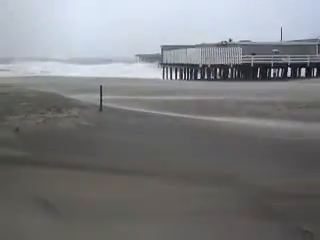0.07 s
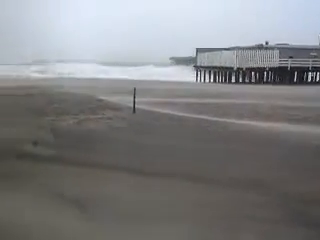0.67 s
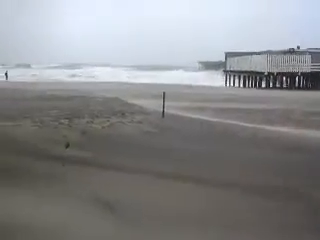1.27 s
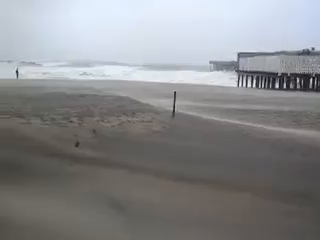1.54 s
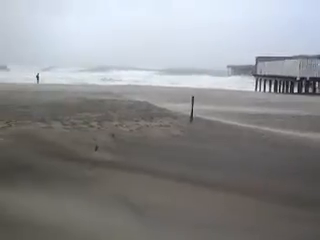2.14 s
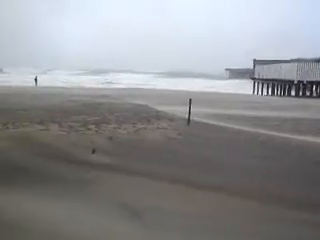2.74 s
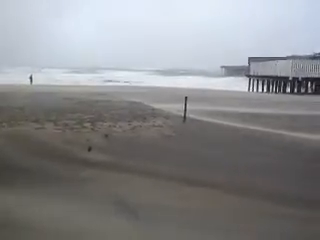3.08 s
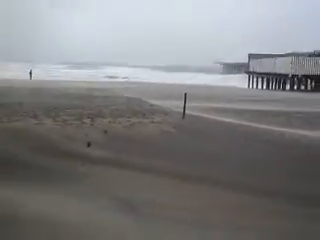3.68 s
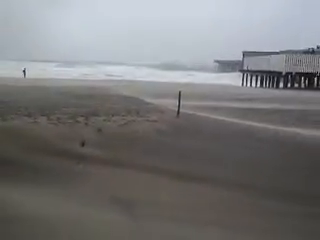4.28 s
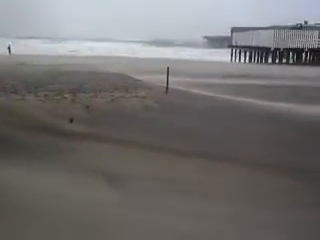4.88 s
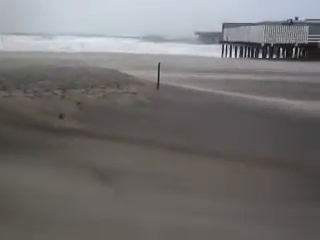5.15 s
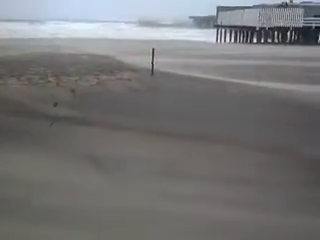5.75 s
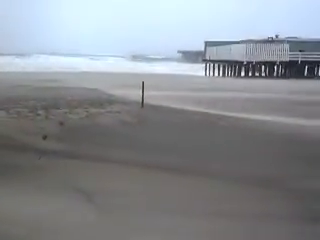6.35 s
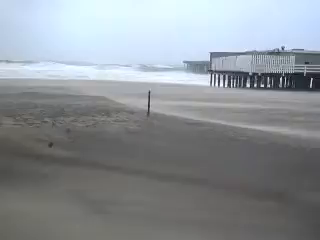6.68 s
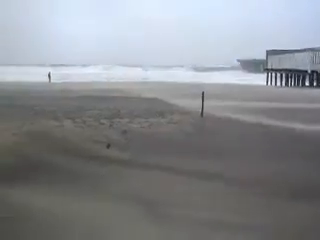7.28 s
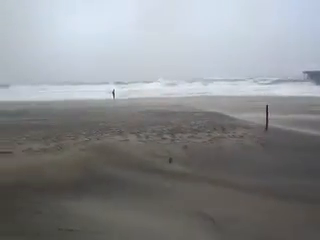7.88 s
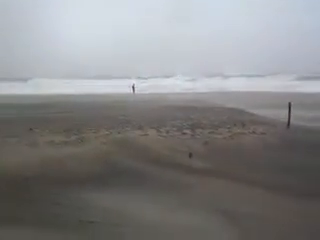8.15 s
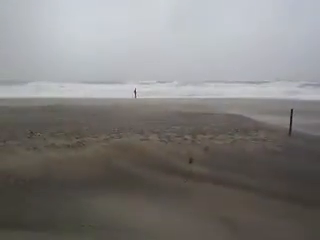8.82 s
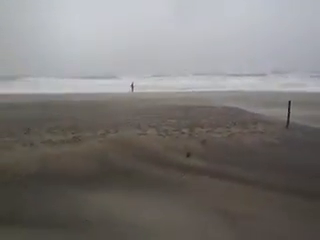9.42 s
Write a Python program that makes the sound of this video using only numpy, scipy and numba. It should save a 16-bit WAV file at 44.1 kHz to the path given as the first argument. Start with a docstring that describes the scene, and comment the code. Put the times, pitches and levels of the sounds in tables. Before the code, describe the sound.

Storm wind on an open beach batters a hand-held microphone with a deep, wide rumble. Gusts tear across it in rasping, crackling bursts, while distant surf is only a faint wash behind. Two sharp little raps come close together early on. About two thirds through, the sound cuts to silence for almost a second, then the wind returns at once and blows to the end.

```python
"""Storm wind on a beach buffets the two microphone ports of a hand-held camera, with surf far behind.
From the start each port rumbles on its own, and gusts tear small eddies across both in rasping, cracking
bursts. Two sharp raps cut in just after 2 s. Near 6.5 s the camera goes silent for almost a second, then
the wind is back at once and blows to the end. Throughout, the camera widens the stereo picture, which
throws the rumble out of phase, and limits and clips the peaks."""
import sys
import numpy as np
from scipy import signal
from scipy.fft import rfft, irfft, next_fast_len
from scipy.io import wavfile
from numba import njit

SR = 44100
rng = np.random.default_rng(int(sys.argv[2]) if len(sys.argv) > 2 else 0)


def unload_wav(signal):
    """Save mono or channel-first audio to the path in sys.argv[1] as 16-bit WAV at rate SR, clipped to [-1, 1]."""
    wavfile.write(
        sys.argv[1],
        SR,
        np.round(np.clip(np.atleast_2d(signal).T, -1, 1) * 32767).astype(np.int16),
    )


N = 420713
TIME = np.arange(N) / SR
SIZE = next_fast_len(N, real=True)
FREQ = np.maximum(np.arange(SIZE // 2 + 1) * SR / SIZE, 1)


def undb(db):
    """Decibels to gain."""
    return 10 ** (np.asarray(db) / 20)


def eq_curve(points):
    """Join (frequency [Hz], value) points on a log-frequency axis."""
    hz, value = np.transpose(points)
    return np.interp(np.log(FREQ), np.log(hz), value)


def noise_spectrum(colour):
    """The spectrum of a noise with this colour and rms 1."""
    return rfft(rng.standard_normal(SIZE)) * colour / np.sqrt(np.mean(colour ** 2))


def noise(colour):
    """Coloured noise for the length of the scene, rms 1."""
    return irfft(noise_spectrum(colour))[:N]


def flutter(slow_hz, fast_hz):
    """Turbulent wobble with equal power in each octave between two rates, rms 1."""
    return noise(1 / np.sqrt(FREQ * (1 + (slow_hz / FREQ) ** 4) * (1 + (FREQ / fast_hz) ** 4)))


def low_pass(x, hz):
    """A steep elliptic high cut."""
    return signal.sosfilt(signal.ellip(12, .1, 95, hz, fs=SR, output="sos"), x)


@njit
def follow(rectified, attack, release):
    """An envelope follower with separate rates for rise and fall."""
    out, level = np.empty(len(rectified)), 0.
    for i in range(len(rectified)):
        level += (rectified[i] - level) * (attack if rectified[i] > level else release)
        out[i] = level
    return out


def limit(x, threshold_db, attack_s, release_s):
    """A stereo-linked limiter holds down the strongest blows, looking a millisecond ahead."""
    envelope = follow(np.abs(x).max(axis=0), 1 / (attack_s * SR), 1 / (release_s * SR))
    ahead = np.roll(envelope, -SR // 1000)
    return x / np.maximum(ahead / undb(threshold_db), 1)


def surf(level_db, swell_db):
    """Far breakers merge into a wash that swells slowly and reaches both ports alike."""
    # tone of the distant breakers: (frequency [Hz], relative level [dB])
    wash_eq = [(60, -17.5), (200, 9.5), (500, 19.5), (1200, -7), (3000, -12), (6000, -22.5), (11000, -29)]
    wash = noise(undb(eq_curve(wash_eq)))
    return wash * undb(level_db + swell_db * flutter(slow_hz=.17, fast_hz=.71))


def raps():
    """Two sharp raps, as if on the camera's case: noise in a broad resonance, alike at both ports."""
    # the hits: (time [s], pitch [Hz], bandwidth [Hz], level [dB], decay [s])
    hits = [(2.169, 2350, 1500, -17, .002), (2.1845, 1650, 1300, -12.5, .0012)]
    out = np.zeros(N)
    for start, hz, width, db, decay in hits:
        ring = noise(1 / (1 + (2 * (FREQ - hz) / width) ** 2))
        age = np.maximum(TIME - start, 0) / decay
        out += undb(db) * ring * 2 * np.sqrt(age) * np.exp(-age)
    return out


def cracks(eddies, boost_db):
    """Each sharp eddy jolts the ports with a single pressure spike, panned at random."""
    # tone of an eddy overloading a port: (frequency [Hz], relative level [dB])
    crack_eq = [(20, -27), (300, -10), (1000, 0.5), (2000, 11.5), (4000, -2), (7000, -17.5), (11000, -27)]
    times, db, _ = np.transpose(eddies)
    angle = 2 * np.pi * rng.random(len(times))
    pan = np.array([np.cos(angle), np.sin(angle)])
    spikes = np.zeros((2, SIZE))
    spikes[:, (times * SR).astype(int)] = undb(db + boost_db) * pan
    colour = undb(eq_curve(crack_eq))
    return irfft(rfft(spikes) * colour / np.sqrt(np.mean(colour ** 2)))[:, :N]


def buffeting():
    """Big eddies push on the ports: the level ride of the rumble in dB."""
    # strength of the push: (time [s], relative level [dB])
    pushes = [(0.01, -8), (.6, -6), (.72, -10.5), (.8, -4), (.9, -9), (1, -6.5), (1.15, -8.5), (1.53, -7.5),
              (1.72, -11), (2.05, -8), (2.18, -6), (2.33, -6), (3.1, -6.5), (3.28, -6.5), (3.45, -8.5),
              (3.8, -5.5), (4.1, -9), (4.19, -6), (5.33, -7.5), (5.48, -12), (5.6, -6.5), (5.85, -3.5),
              (6.22, -10.5), (6.42, -4.5), (7.37, -3.5), (7.6, -7), (7.95, -11.5), (8.27, -10), (8.41, -7),
              (8.54, -7), (8.66, -12.5), (8.78, -9.5), (9.15, -5.5), (9.36, -10), (9.53, -9)]
    times, db = np.transpose(pushes)
    return np.interp(TIME, times, db)


def surges():
    """Heavy shoves of air swell and ebb smoothly: the lift of the roar's body in dB."""
    # shoves of air: (peak time [s], length [s], lift [dB])
    shoves = [(0.46, 0.088, 2.5), (2.59, .34, 2), (3.057, 0.11, 1.5), (4.79, 0.27, 3.5), (5.17, 0.055, 5),
              (5.964, 0.085, 3.5), (7.425, 0.12, 4), (8.42, .07, 0.5), (8.535, .07, 2), (9.093, .14, 1)]
    return sum(db * np.exp(-(2 * (TIME - peak) / length) ** 2) for peak, length, db in shoves)


def gusts(attack_s, release_s):
    """Each gust rises quickly, crests and dies back to the steady wind: tearing and hiss in dB."""
    # gusts that tear across the ports: (start [s], end [s], relative tearing [dB], extra hiss [dB])
    blasts = [(0.392, 0.7, -27.5, -2.5), (0.967, 1.62, -26.5, -4.5), (1.988, 2.203, -28, -8),
              (2.344, 2.979, -23.5, 1), (3.015, 3.215, -28, -6.5), (3.366, 3.992, -25, 1.5),
              (4.041, 4.085, -29.5, 4), (4.12, 4.487, -23.5, 2), (4.494, 4.583, -28, 0),
              (4.671, 5.2, -27.5, -2), (5.28, 5.377, -29.5, -2.5), (5.677, 6.02, -30.5, -1),
              (6.342, 6.484, -24.5, 4.5), (7.33, 7.765, -27, 8), (7.813, 8.058, -26, -1.5),
              (8.067, 8.258, -28, 5), (8.305, 8.45, -25.5, -8.5), (8.498, 8.582, -23, -10.5),
              (8.684, 8.897, -28.5, 5.5), (8.914, 9.31, -22, 5.5), (9.3, 9.56, -24, 0.5)]
    tear_db, hiss_db = np.full(N, -35.), np.full(N, -6.5)  # the bed between gusts
    for start, end, db, extra_db in blasts:
        rise = (TIME - start) / attack_s + .5
        fall = (end - TIME) / release_s + .5
        blowing = np.clip(np.minimum(rise, fall), 0, 1)
        crest_db = np.interp(TIME, [start, (start + end) / 2, end], [-.5, .5, -.5])  # keenest mid-gust
        tear_db += blowing * (db - tear_db)
        hiss_db += blowing * (extra_db + crest_db - hiss_db)
    return tear_db, hiss_db


def lulls(recovery_s):
    """The flow settles for a moment, then breaks away again all at once: the dip in dB."""
    # moments of smooth flow: (end [s], dip in the tearing [dB], length [s])
    calms = [(.078, -12, .015), (.29, -13, .03), (.376, -14, .027), (.459, -12, .01), (.616, -16, .009),
             (.916, -11, .025), (1.087, -12, .013), (1.13, -26, .016), (1.152, -13, .009),
             (1.249, -12, .012), (1.327, -14, .024), (1.609, -10, .01), (1.89, -15, .018),
             (2.208, -12, .017), (2.254, -11, .018), (3.148, -8, .012), (3.282, -16, .02),
             (3.349, -12, .012), (4.017, -7, .012), (4.31, -16, .011), (4.431, -13, .009),
             (4.553, -14, .01), (4.802, -16, .013), (5.27, -15, .018), (5.431, -18, .025),
             (5.487, -19, .038), (5.575, -18, .07), (6.06, -11, .012), (6.119, -8, .014),
             (6.272, -11, .014), (6.335, -8, .03), (6.362, -10, .007), (7.807, -14, .022),
             (8.05, -13, .019), (8.305, -26, .043), (8.502, -12, .043), (8.588, -15, .026),
             (8.903, -17, .014), (9.519, -17, .019)]
    dip_db = np.zeros(N)
    for end, db, length in calms:
        near = slice(max(int((end - .12) * SR), 0), int((end + .02) * SR))
        age = TIME[near] - end
        dip_db[near] += db * np.exp(-np.where(age < 0, age / length, age / recovery_s) ** 4)
    return dip_db


def snaps(flow_db, per_second, above_db, spread_db, length_s):
    """Stray eddies snap at random, riding on the flow's level: rows of (time [s], peak [dB], length [s])."""
    when, strength, stretch = rng.random((per_second * N // SR, 3)).T
    at = (when * (N - 1)).astype(int)
    peak_db = flow_db[at] + above_db + spread_db * (2 * strength - 1)
    return list(zip(at / SR, peak_db, length_s * (.5 + stretch)))


def tearing(flow_db, eddies, spread_db, breakaway_db, ceiling_db, hush_db):
    """Level of the small eddies in dB: fitful in weak flow, steadier once it has fully broken away."""
    fitfulness = np.clip(1 + .02 * (breakaway_db - flow_db), .7, 1.3)
    fits = undb(flow_db + spread_db * fitfulness * flutter(slow_hz=14, fast_hz=230))
    fits /= np.hypot(1, fits / undb(ceiling_db))
    for peak, db, length in eddies:
        near = slice(max(int((peak - .04) * SR), 0), int((peak + .04) * SR))
        age = (TIME[near] - peak) / length
        # a sharp eddy swells and passes within milliseconds, after a moment of smoother flow
        fits[near] *= undb(hush_db * np.exp(-(age + 1) ** 2))
        transient = undb(db) * np.exp(-np.abs(1.3 * age) ** 5)
        fits[near] = np.hypot(fits[near], transient)
    return 20 * np.log10(fits)


def wind_at_port(buffet_db, tear_db, hiss_db, surge_db, buffet_trim_db=-6.5, tear_trim_db=15):
    """Pressure at one port: big eddies carry the bass, small ones take over towards the treble."""
    # tone of the turbulent pressure: (frequency [Hz], relative level [dB])
    pressure_eq = [(20, -25.5), (40, -29), (60, -16), (85, -4), (120, 3.5), (220, 1.14), (400, -4),
                   (650, -13), (1000, -19), (1900, -25), (3500, -35), (5500, -45), (8000, -56.5),
                   (11000, -63)]
    # how each band answers the flow: (centre [Hz], tearing share [0-1], hiss share [0-1], flicker [dB])
    bands = [(49.4, 0.01, 0.2, 4.5), (121, 0.08, 0.08, -1), (300, 0.13, 0.03, 0.5), (606, 0.39, 0, 0.5),
             (1220, 0.49, 0.03, -1.5), (2640, 0.82, 0.3, 4), (4670, 0.8, 0.92, 3.5), (9600, 0.7, 1.0, 3.5)]
    body_hz, body_octaves, ceiling_db = 650, .58, 10
    pressure = noise_spectrum(undb(eq_curve(pressure_eq)))
    buffet_db = buffet_db + buffet_trim_db + 3 * np.tanh(flutter(slow_hz=5.6, fast_hz=59.3))
    tear_db = tear_db + tear_trim_db + .57 * flutter(slow_hz=61.2, fast_hz=492)
    out = np.zeros(N)
    for hz, tear_share, hiss_share, flicker_db in bands:
        crossover = eq_curve([(centre, centre == hz) for centre, *_ in bands])
        body_share = np.exp(-(np.log2(hz / body_hz) / body_octaves) ** 2)
        db = buffet_db + tear_share * (tear_db - buffet_db) + hiss_share * hiss_db + body_share * surge_db
        # smaller eddies live shorter, so higher bands flicker faster
        gain = undb(db + flicker_db * flutter(slow_hz=.62 * np.sqrt(hz), fast_hz=1.8 * np.sqrt(hz)))
        # a fixed soft ceiling rounds off the sharpest spikes in each band
        gain /= np.hypot(1, gain / undb(ceiling_db))
        out += irfft(pressure * crossover)[:N] * gain
    return out


def scene():
    """The same gusts drive both ports, but each feels its own pressure; cracks, raps and surf join in."""
    # the sharpest eddies: (time [s], relative peak [dB], length [s])
    bursts = [(.041, -21, 0.0032), (.088, -30.5, 0.0013), (.137, -28, 0.0017), (.146, -18, 0.0014),
              (.169, -27, 0.0017), (.249, -26, 0.0013), (.295, -19, 0.0017), (.335, -21, .004),
              (.461, -23, 0.0034), (.497, -16.5, .005), (.555, -13, 0.0043), (.643, -14, 0.0015),
              (.668, -10, 0.0057), (.707, -11, 0.0065), (.924, -25, 0.00099), (1.001, -13, .002),
              (1.019, -7, 0.0044), (1.03, -10.5, 0.0018), (1.092, -16, 0.0018), (1.134, -11, 0.0032),
              (1.157, -13.5, 0.0029), (1.2, -13, 0.0096), (1.221, -13, 0.0018), (1.253, -21, .003),
              (1.28, -16.5, 0.0015), (1.298, -20, .002), (1.337, -18, .002), (1.347, -20, .003),
              (1.493, -11, 0.0015), (1.507, -17.5, 0.0036), (1.611, -13.5, 0.0058), (1.622, -16, 0.00084),
              (1.705, -23, 0.0014), (1.757, -14.5, 0.0016), (1.808, -18.5, 0.003), (1.864, -18, 0.0071),
              (1.893, -15, 0.0033), (1.906, -17.5, 0.0053), (2.171, -12, .004), (2.186, -14.5, .002),
              (2.211, -17, 0.0017), (2.256, -25, .002), (2.263, -21, 0.0009), (2.305, -14.5, 0.0014),
              (2.38, -10.5, 0.005), (2.589, -13, .0025), (2.793, -10.5, 0.0022), (2.955, -11, .002),
              (2.972, -9, 0.0019), (3.064, -14, .0015), (3.152, -16, .006), (3.181, -15.5, 0.0015),
              (3.23, -14.5, 0.00071), (3.298, -20, 0.0047), (3.328, -19, .0012), (3.401, -15.5, 0.0027),
              (3.419, -12.5, .002), (3.486, -10, 0.0069), (3.692, -15, 0.0018), (3.846, -14.5, 0.0011),
              (3.902, -7.5, .0024), (3.928, -14.5, 0.013), (4.068, -19, 0.0017), (4.157, -12, 0.0023),
              (4.17, -14, .002), (4.266, -14.5, 0.0042), (4.313, -14, 0.002), (4.333, -17, 0.0035),
              (4.433, -10, 0.0018), (4.477, -15, 0.0015), (4.526, -13, 0.0014), (4.555, -13, .003),
              (4.692, -16.5, 0.0014), (4.826, -13, .002), (4.952, -11, 0.0043), (5.04, -18, .003),
              (5.068, -18, .0015), (5.079, -15.5, 0.0018), (5.094, -18, 0.00092), (5.197, -14, 0.004),
              (5.216, -16.5, 0.0049), (5.272, -21, .0015), (5.316, -16, 0.009), (5.361, -14.5, 0.0008),
              (5.435, -36, 0.00058), (5.497, -22.5, 0.0015), (5.583, -24.5, 0.00059), (5.603, -27, 0.0029),
              (5.705, -17, .004), (5.765, -17.5, 0.0073), (5.793, -17, 0.00088), (5.884, -38, 0.0018),
              (5.977, -10, 0.0041), (6.061, -21.5, 0.0023), (6.123, -17, .003), (6.207, -22, 0.00073),
              (6.275, -21.5, 0.0036), (6.296, -22.5, 0.0012), (6.365, -11.5, 0.0032), (6.41, -15, 0.0017),
              (7.351, -38, .004), (7.701, -15.5, 0.0048), (7.715, -10, 0.0014), (7.776, -10.5, 0.0018),
              (7.85, -29, 0.0011), (8.057, -18.5, 0.0043), (8.241, -22, 0.0077), (8.314, -27, .005),
              (8.369, -19.5, 0.021), (8.395, -5.5, 0.0031), (8.425, -16.5, 0.012), (8.452, -22, .002),
              (8.523, -15, 0.0025), (8.553, -21, 0.0037), (8.614, -13.5, 0.0056), (8.689, -22, .005),
              (8.718, -19, 0.0057), (8.787, -15, 0.0067), (8.832, -11.5, 0.0016), (8.88, -13, .003),
              (8.912, -13.5, 0.012), (9.02, -27, 0.013), (9.352, -9, 0.0018), (9.406, -14, 0.00089),
              (9.428, -19, .0012), (9.474, -11.5, 0.0046)]
    gust_db, hiss_db = gusts(attack_s=.013, release_s=.018)
    dip_db = lulls(recovery_s=.0016)
    flow_db = gust_db + dip_db
    eddies = bursts + snaps(flow_db, per_second=12, above_db=6, spread_db=4, length_s=.0006)
    tear_db = tearing(flow_db, eddies, spread_db=6, breakaway_db=-31.5, ceiling_db=-17, hush_db=-3)
    # the torn flow flaps against both ports at once, which makes it rasp
    rasp_db = 3.8 * np.tanh(1.6 * flutter(slow_hz=68.6, fast_hz=446))
    wander_db = 4.5 * flutter(slow_hz=2.7, fast_hz=21)
    # a lull ducks the hiss further still, while the big eddies barely feel it
    hiss_db += .27 * dip_db + wander_db
    buffet_db = buffeting() + .13 * dip_db
    wind = np.array([wind_at_port(buffet_db, tear_db + rasp_db, hiss_db, surges()) for _ in range(2)])
    return wind + cracks(bursts, boost_db=9) + raps() + surf(level_db=-47.5, swell_db=6)


def record(dry):
    """The camera widens by taking the delayed other port from each, then mutes once, limits and clips."""
    crossfeed, lag_samples, clip_level = .87, 16, .96
    mute_s, unmute_s, fade_s = 6.491, 7.346, .004
    wide = dry - crossfeed * np.roll(dry[::-1], lag_samples, axis=1)
    # the sound dies within milliseconds and comes back all at once
    fade = np.exp(-np.clip(TIME - mute_s, 0, .1) / fade_s)
    gate = np.where(TIME < unmute_s, fade, 1)
    dulled = low_pass(wide * gate, hz=11050)
    limited = limit(dulled, threshold_db=.3, attack_s=.0003, release_s=.01)
    return low_pass(np.clip(limited, -clip_level, clip_level), hz=11526)


dry = scene()
out = record(dry)
unload_wav(out)
```